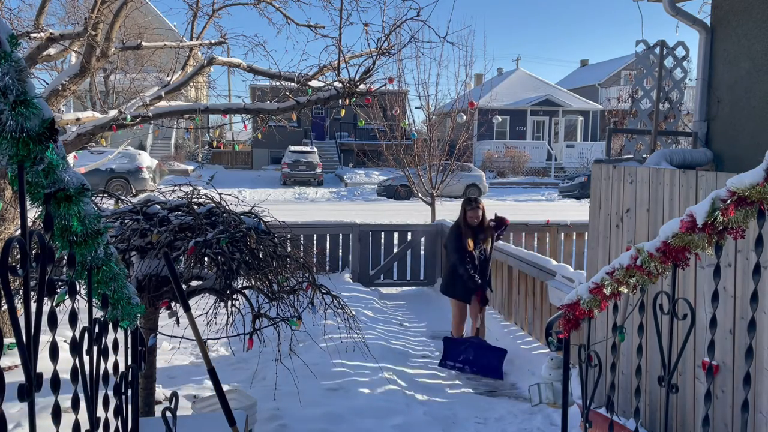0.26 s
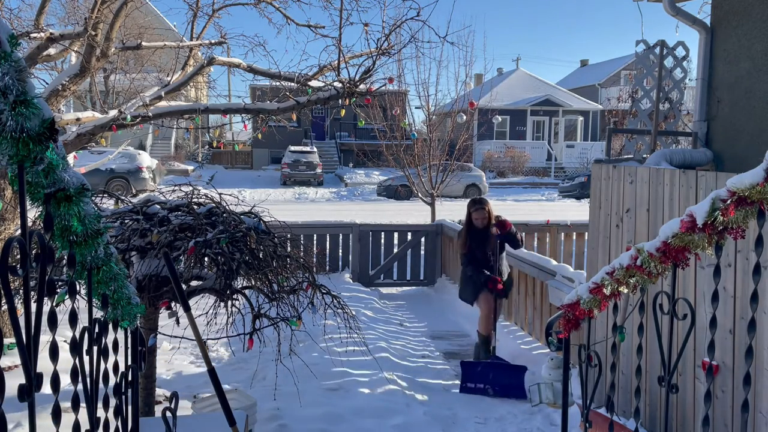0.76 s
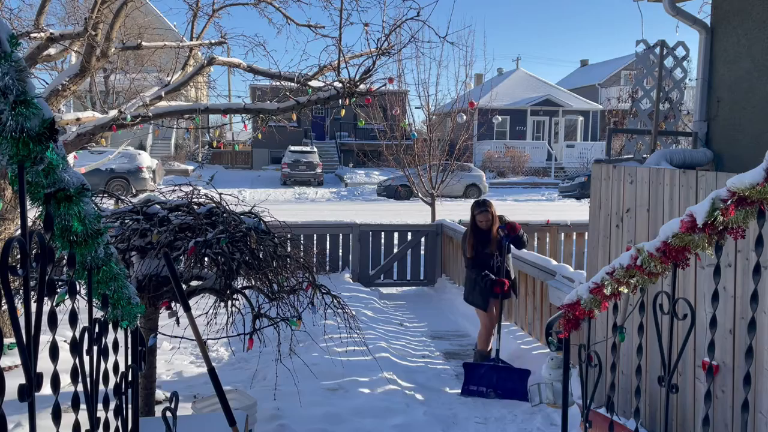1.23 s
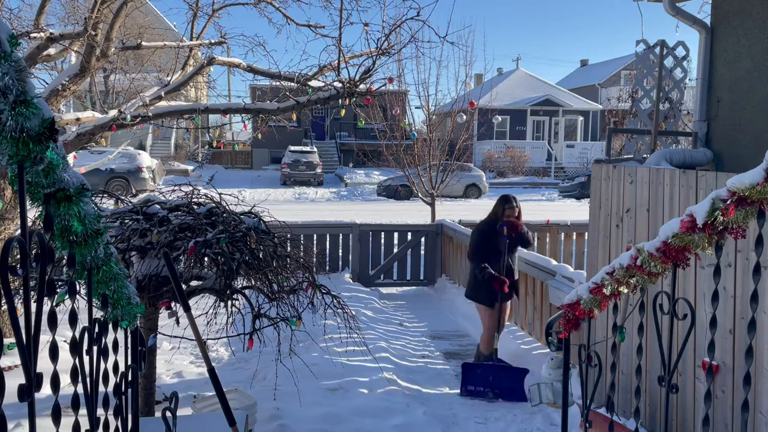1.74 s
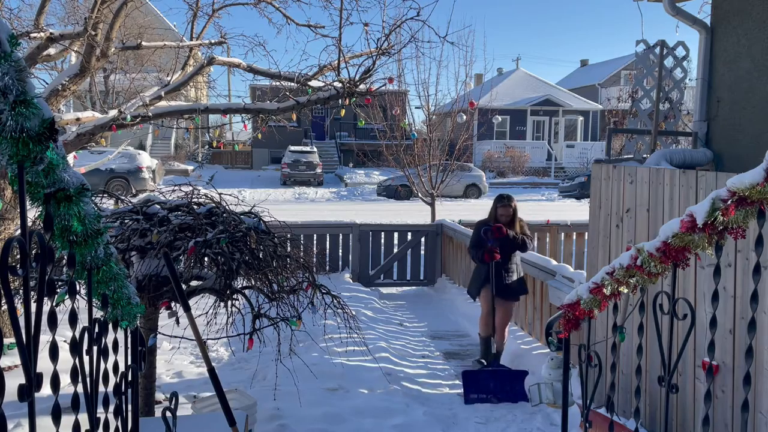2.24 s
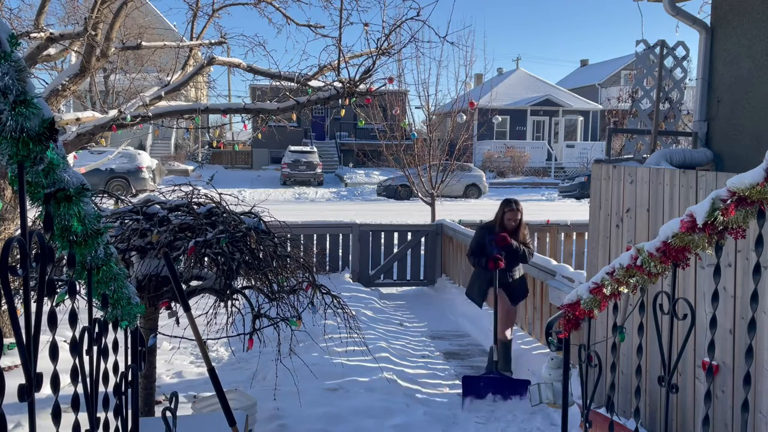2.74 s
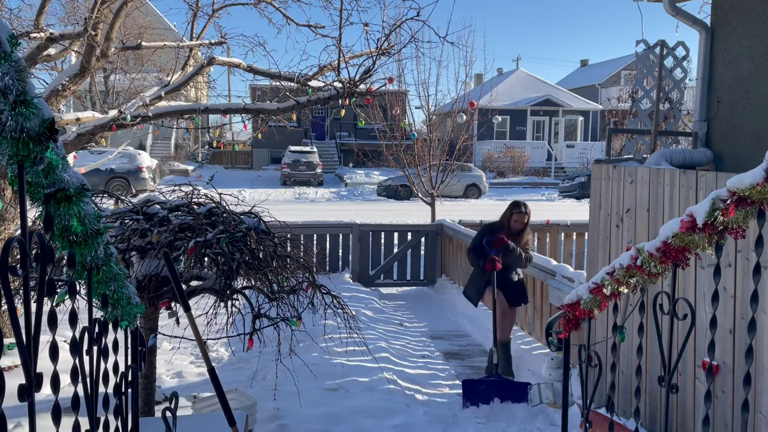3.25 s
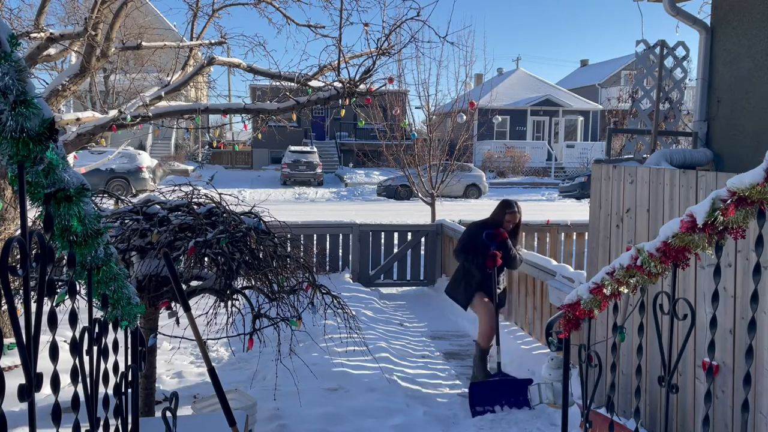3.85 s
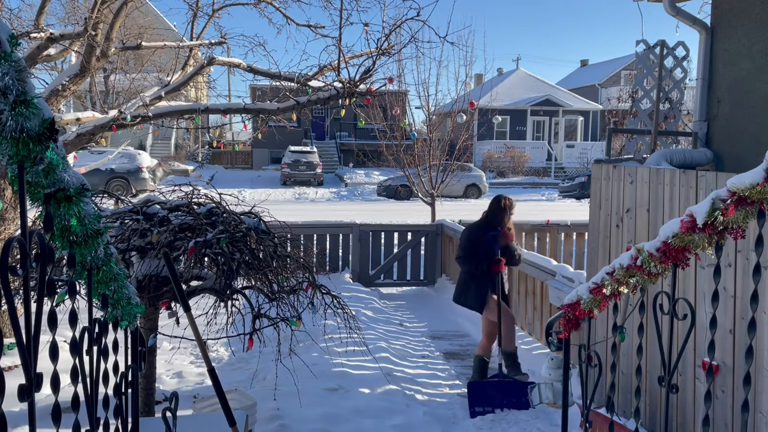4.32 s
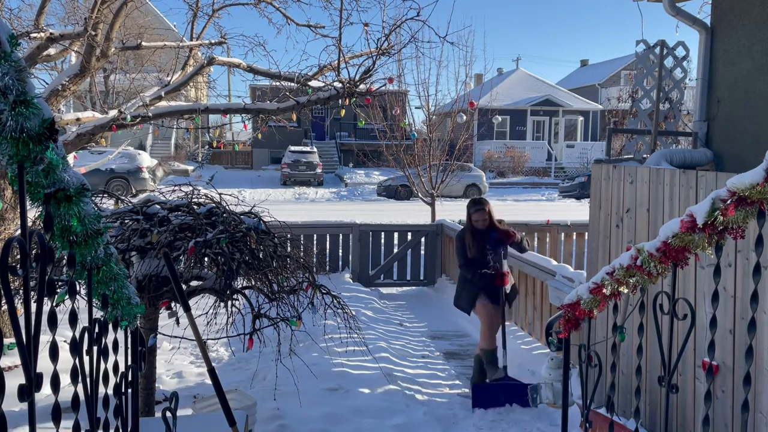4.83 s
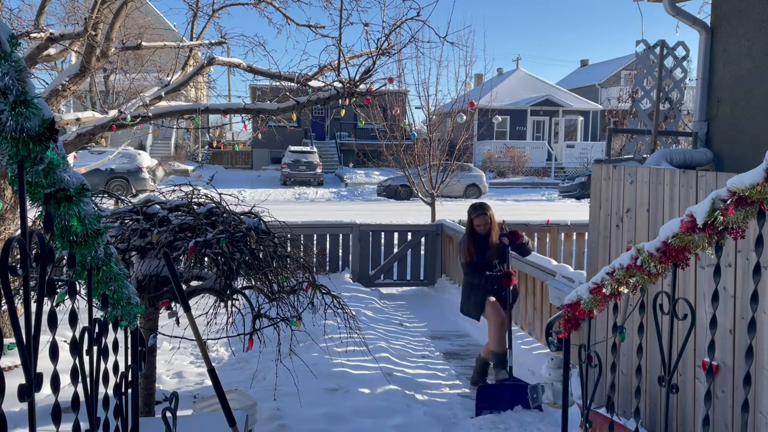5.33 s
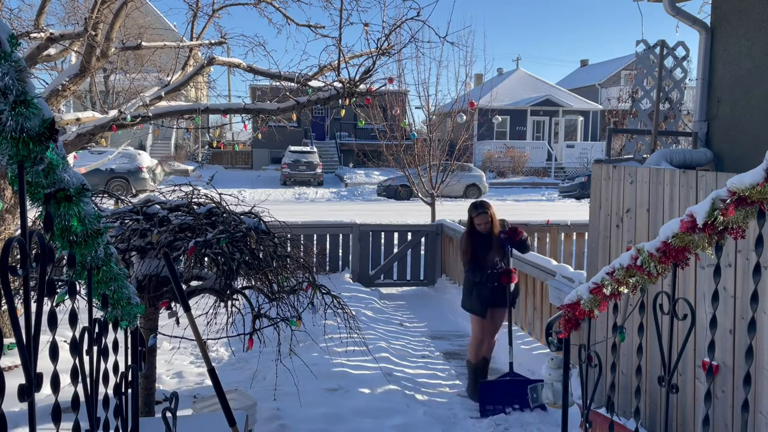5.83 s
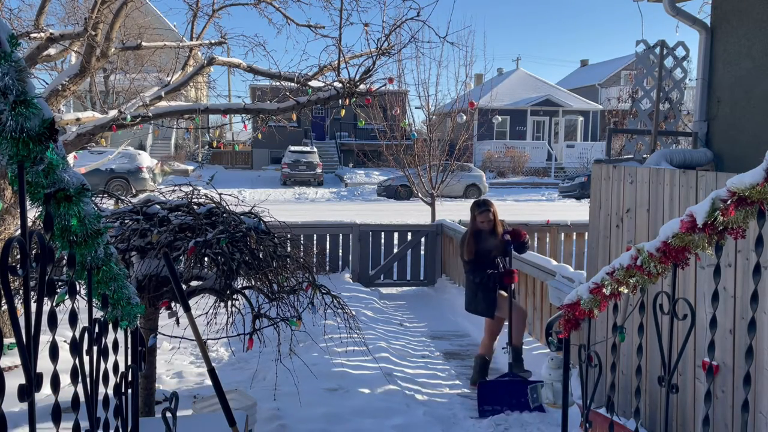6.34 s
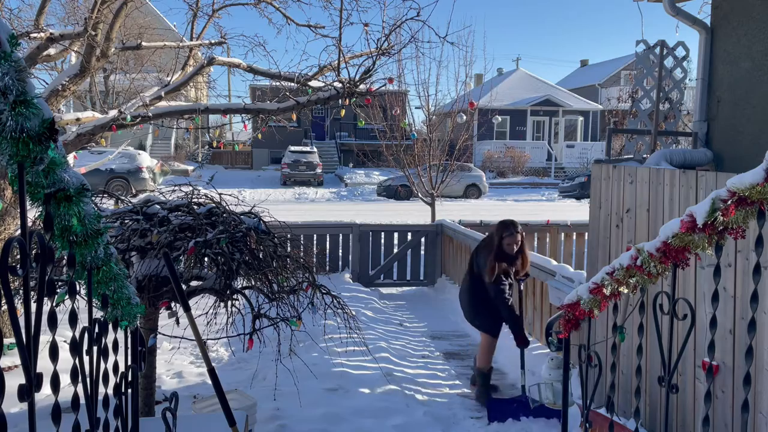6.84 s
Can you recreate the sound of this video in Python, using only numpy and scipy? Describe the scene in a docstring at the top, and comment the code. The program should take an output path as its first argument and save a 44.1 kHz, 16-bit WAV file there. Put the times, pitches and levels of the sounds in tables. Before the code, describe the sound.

A plastic shovel works through cold snow on a wooden deck in many short, irregular strokes. The blade catches with crisp crunches and sharp clicks, the boards thud dully beneath it, and loose snow hisses softly in between. The strokes grow lighter near the end as distant tyres swell a little. It is heard outdoors in a small yard, with very short reflections and a faint street rumble.

```python
"""Crunches, thuds and hiss: a plastic shovel working through cold snow on a wooden deck.
Each catch of the blade or tread of a boot is a burst of tiny snow fractures that rings the blade
and shakes the boards. The edge clicks on ice, loose snow slides, packed snow squeaks once.
Railings and house walls scatter it all, over a quiet street with distant tyres."""
import sys
import numpy as np
from scipy import signal
from scipy.fft import rfft, irfft
from scipy.io import wavfile
from scipy.ndimage import uniform_filter1d

SR = 44100
rng = np.random.default_rng(int(sys.argv[2]) if len(sys.argv) > 2 else 0)


def file_out(sig):
    """Save sig as 16-bit WAV at sys.argv[1]."""
    # one column per channel
    cols = np.atleast_2d(sig).T
    # limit, then scale
    lim = np.clip(cols, -1, 1)
    pcm = np.round(lim * 32767).astype(np.int16)
    wavfile.write(sys.argv[1], SR, pcm)


N = 312228
TIME = np.arange(N) / SR
FREQS = np.maximum(np.arange(N // 2 + 1) * SR / N, 1)
TOP_HZ = 15900

# plastic blade modes: freq_hz, width_hz, gain_db
BLADE_MODES = [(643, 14.4, 5.5), (1004, 140, -5), (1129, 85, 10.5), (1740, 270, -8.5), (2043, 36, 0),
               (2570, 630, -0.5), (3470, 170, -7.5), (3884, 210, -9), (4580, 260, -11.5)]
# pushes through loose snow: start_s, end_s, level_db
SHOVES = [(0.02, 0.20, -66.5), (0.524, 0.583, -51.5), (0.642, 0.68, -51.5), (0.789, 0.926, -45),
          (0.998, 1.08, -49.5), (1.212, 1.489, -48), (1.556, 1.657, -50), (1.669, 1.766, -59.5),
          (1.82, 1.879, -49.5), (2.14, 2.32, -48.5), (2.33, 2.596, -51.5), (2.724, 2.905, -48),
          (3.086, 3.271, -46.5), (3.32, 3.498, -52.5), (3.649, 3.811, -52.5), (4.279, 4.45, -48.5),
          (4.579, 4.67, -52.5), (4.738, 4.799, -61), (4.906, 5.024, -50), (5.199, 5.292, -50.5),
          (5.442, 5.511, -47.5), (5.593, 5.636, -39), (5.774, 5.919, -52), (6.217, 6.336, -58.5),
          (6.408, 6.483, -56.5), (6.599, 6.70, -54.5), (6.711, 6.866, -49.5), (6.865, 7.069, -58.5)]


def undb(db):
    """Decibels to gain."""
    return 10 ** (np.asarray(db) / 20)


def unit(x):
    """Scale to rms 1."""
    return x / np.sqrt(np.mean(x ** 2))


def colour(points):
    """Gain per frequency from rows of freq_hz, gain_db."""
    hz, db = np.transpose(points)
    return undb(np.interp(np.log(FREQS), np.log(hz), db))


def shape(x, gain):
    """Filter by a gain per frequency."""
    return irfft(rfft(x) * gain, N)


def ring(modes, freqs):
    """Summed response of damped resonances."""
    return sum(undb(db) / (1 + 1j * (freqs ** 2 - hz ** 2) / (freqs * width)) for hz, width, db in modes)


def walk(rate_hz):
    """Random drift, spread a little under 1."""
    knots = rng.standard_normal(int(TIME[-1] * rate_hz) + 2)
    return np.interp(TIME * rate_hz, np.arange(len(knots)), knots)


def distant(spectrum, alike_hz, waver_db):
    """Far-off wavering noise, alike in both ears only in the bass."""
    mid, side = rng.standard_normal((2, N))
    gain = colour(spectrum)
    width = 1 / np.sqrt(1 + (alike_hz / FREQS) ** 2)
    stereo = shape(mid, gain) + np.array([[1], [-1]]) * shape(side, gain * width)
    return unit(stereo) * undb(waver_db * walk(9.8))


def street(level_db=-52.5):
    """Low rumble of the still street."""
    # rumble spectrum: freq_hz, gain_db
    spectrum = [(25, -3.5), (60, -2), (130, 4.5), (200, 1), (330, -10), (550, -33), (1100, -39),
                (2200, -29), (5000, -38), (14000, -61)]
    return undb(level_db) * distant(spectrum, alike_hz=183, waver_db=-3.0)


def traffic():
    """Distant tyres, swelling near the end."""
    # tyre noise envelope: time_s, level_db
    levels = [(0, -53), (.4, -55), (1.2, -58.5), (4, -57.5), (5.5, -54.5), (6.1, -51), (6.6, -46.5),
              (7.08, -50)]
    # tyre spectrum: freq_hz, gain_db
    spectrum = [(60, -7), (150, 5.5), (350, 0.5), (550, -2.5), (900, -4.5), (1500, -11.5), (3000, -22),
                (8000, -36)]
    level_db = np.interp(TIME, *np.transpose(levels))
    return undb(level_db) * distant(spectrum, alike_hz=330, waver_db=0.8)


def wall_echoes(delay_s, t60_s, low_hz, high_hz):
    """Stereo frequency response of diffuse reflections, dulled by snow cover."""
    decay = undb(-60 * np.minimum(TIME / t60_s, 4))
    tail = rng.standard_normal((2, N)) * (TIME > delay_s) * decay
    tail /= np.sqrt(np.sum(tail ** 2, axis=1, keepdims=True))
    return rfft(tail) / np.sqrt((1 + (low_hz / FREQS) ** 2) * (1 + (FREQS / high_hz) ** 4))


def railings(x, t60_s=0.026, size=1024):
    """Quick scatter off the slats; new random paths each frame stand for the blade's movement."""
    _, _, frames = signal.stft(x, nperseg=size, nfft=4 * size)
    t, hop = np.arange(size) / SR, size // 2
    paths = rng.standard_normal((2, frames.shape[1], size)) * undb(-60 * t / t60_s)
    paths /= np.sqrt(np.sum(paths ** 2, axis=-1, keepdims=True))
    pieces = irfft(frames.T * rfft(paths, 4 * size)) * hop
    out = np.zeros((2, N + 6 * size))
    for k in range(frames.shape[1]):
        out[:, k * hop:k * hop + 4 * size] += pieces[:, k]
    return out[:, hop:hop + N]


def yard(x, walls_db=-21):
    """Mono to stereo: direct path, railing scatter, then the house walls."""
    # power share arriving via the railings: freq_hz, share_db
    scatter = [(100, -15), (330, -6), (600, -0.5), (1200, -9.5), (2500, -3), (5000, 0), (8000, -7),
               (14000, -5)]
    # direct path, reaching the left ear slightly after the right: freq_hz, phase_rad
    left_phase = [(350, 0), (900, -0.93), (1500, -1.54), (2800, 0.48), (5000, -1), (6300, -1.2),
                  (7900, -2.5), (9000, -4.5), (10500, -5.5), (12500, -20.5), (14000, -8)]
    # fence side against open side: freq_hz, left_minus_right_db
    balance = [(60, -3), (110, -1.5), (200, -3.5), (380, -3), (700, 0.5), (1200, -4), (2300, 1.5),
               (4400, 4.5), (8100, 0), (15000, -0.5)]
    scattered = np.minimum(colour(scatter), .95)
    phase_rad = np.interp(FREQS, *np.transpose(left_phase)) * np.array([[1], [0]])
    direct = np.sqrt(1 - scattered ** 2) * np.exp(1j * phase_rad)
    walls = undb(walls_db) * wall_echoes(delay_s=0.009, t60_s=0.12, low_hz=150, high_hz=7000)
    heard = shape(x, direct + walls) + shape(railings(x), scattered)
    return shape(heard, colour(balance) ** np.array([[.5], [-.5]]))


def fractures(per_s, spread_db, slip_hz, slip_db):
    """Dense clicks of breaking crystals, a few large, bunched by stick and slip."""
    size = undb(spread_db * np.minimum(rng.exponential(size=N), 4))
    clicks = (rng.random(N) < per_s / SR) * size * rng.choice([-1, 1], N)
    clicks *= undb(slip_db * walk(slip_hz))
    return clicks / np.sqrt(uniform_filter1d(clicks ** 2, size=800) + 1e-6)


def snow_band(low_hz, high_hz):
    """One band of the snow's spectrum as the blade radiates it, at unit power."""
    # breaking snow: freq_hz, gain_db
    spectrum = [(200, -25), (480, -3.5), (800, 1.5), (1100, -4.5), (1450, 0.5), (2000, -2), (2700, -4),
                (4000, -1), (5500, -3), (7500, -4), (9000, -7), (13000, -8), (14500, -27), (16000, -28)]
    gain = colour(spectrum) * (1 + ring(BLADE_MODES, FREQS))
    gain /= np.sqrt((1 + (low_hz / FREQS) ** 8) * (1 + (FREQS / high_hz) ** 8))
    return gain / np.sqrt(np.mean(abs(gain) ** 2))


def squeak(peak_s=4.48, width_s=0.01, level_db=-42):
    """Packed snow slips and chirps in a few narrow bands."""
    # slip resonances, applied twice: freq_hz, width_hz, gain_db
    modes = [(2080, 280, -1), (2330, 240, -5), (3400, 320, 0), (4120, 360, -9)]
    rub = unit(shape(rng.standard_normal(N), ring(modes, FREQS) ** 2))
    return rub * undb(level_db) * np.exp(-((TIME - peak_s) / width_s) ** 2)


def slide(gain_db=-4, trickle_db=-80, attack_s=0.008, release_s=0.035):
    """Loose snow hisses over the blade during shoves and trickles in between."""
    flow = undb(trickle_db)
    for start_s, end_s, db in SHOVES:
        outside = np.maximum((start_s - TIME) / attack_s, (TIME - end_s) / release_s)
        flow = np.maximum(flow, undb(db + gain_db) * np.exp(-np.clip(outside, 0, 20)))
    grains = fractures(per_s=7000, spread_db=3.8, slip_hz=70, slip_db=3)
    return shape(grains * flow, snow_band(1030, 14600))


def ticks(decay_s=0.0018):
    """The edge clicks on ice and board and leaves the blade ringing."""
    # edge contacts: start_s, level_db, ring_over_click_db
    hits = [(.356, -47, 3), (.457, -20, 3), (.501, -24, 5), (.748, -40, 17), (.850, -15, 1),
            (1.046, -41, 22), (1.500, -28, 6), (1.532, -21, 7), (1.589, -30, 6), (2.503, -25, 4),
            (2.711, -21, 8), (3.207, -21, 7), (3.336, -28, 6), (3.778, -34, 5), (4.053, -21, 6),
            (4.404, -33, 0), (4.859, -31, 7), (4.882, -23, 5), (5.056, -38, 9), (5.502, -34, 7),
            (5.599, -21, 4), (6.274, -36, 0), (6.449, -39, 6)]
    crack, push = np.zeros((2, N))
    t = np.arange(SR // 20) / SR
    for start_s, db, ring_db in hits:
        hit = rng.standard_normal(len(t)) * np.exp(-t / decay_s) * undb(db)
        near = slice(int(start_s * SR), int(start_s * SR) + len(t))
        crack[near] += hit
        push[near] += hit * undb(ring_db)
    return shape(crack, snow_band(700, TOP_HZ)) + shape(push, ring(BLADE_MODES, FREQS))


def jolts(swell_s=0.0072):
    """The deck bounces on its joists; snow damps it within a few cycles."""
    # heavy blows: start_s, peak_db, pitch_hz
    blows = [(0.829, -22, 169), (1.524, -28, 98), (2.511, -22.5, 148.8), (4.055, -19.5, 151),
             (5.153, -46, 119), (6.226, -25, 163)]
    out, t = np.zeros(N), np.arange(SR // 10) / SR
    envelope = t / swell_s * np.exp(1 - t / swell_s)
    for start_s, db, hz in blows:
        start = int(start_s * SR)
        out[start:start + len(t)] += undb(db) * envelope * np.sin(2 * np.pi * hz * t)
    return out


def pressure(t, rise_s, fall_s, round_s=0.0018, reach_s=0.12):
    """Load builds to a rounded peak at t = 0, then lets go."""
    away_s = np.hypot(t, round_s) - round_s
    return np.exp(-away_s / np.where(t < 0, rise_s, fall_s) - (t / reach_s) ** 4)


def burst(peak_s, length_s, crunch_db, treble_db, thud_db, pitch_hz, rise_share=0.4):
    """One giving-way of snow, its length split into loading and release."""
    rise_s = length_s * rise_share
    return peak_s, rise_s, length_s - rise_s, crunch_db, treble_db, thud_db, pitch_hz


def knocks(length_s=0.013):
    """Boot or blade knocks dully on the boards, squashing a little snow."""
    # dull contacts: peak_s, thud_db
    hits = [(0.029, -45.5), (1.213, -34), (1.23, -31), (1.84, -27), (2.345, -29.5), (2.875, -21),
            (3.014, -19), (3.109, -36.5), (3.366, -26), (4.610, -33.5), (5.058, -32), (6.632, -29.5)]
    return [burst(peak_s, length_s, crunch_db=db - 20.5, treble_db=-1, thud_db=db, pitch_hz=268)
            for peak_s, db in hits]


def snags(per_s=25, length_s=0.021, over_shove_db=3, spread_db=4.7):
    """Small catches at uneven steps along every shove."""
    bursts = []
    for start_s, end_s, shove_db in SHOVES:
        count = max(round((end_s - start_s) * per_s), 1)
        places, sizes = rng.random(size=16), rng.standard_normal(size=16)
        for k in range(count):
            db = shove_db + over_shove_db + spread_db * sizes[k]
            peak_s = start_s + (end_s - start_s) * (k + (.5 + places[k]) / 2) / count
            bursts.append(burst(peak_s, length_s, db, treble_db=-1, thud_db=db + 2, pitch_hz=230))
    return bursts


def catches():
    """The blade catches and the snow gives way."""
    # blade catches: peak_s, length_s, crunch_db, treble_over_crunch_db, thud_db, thud_pitch_hz
    hits = [(0.091, 0.048, -50, -10, -49, 210), (0.459, 0.014, -27.5, -1.5, -23.5, 250),
            (0.506, 0.024, -38.5, -4, -29, 266), (0.525, 0.013, -33.5, -5, -30.5, 230),
            (0.685, 0.023, -34.5, -7, -31, 274), (0.834, .023, -22, -5.5, -15.5, 320),
            (0.901, 0.017, -37, 1, -32.5, 262), (1.017, 0.033, -39, 0.5, -41, 275),
            (1.255, 0.0054, -39, 4.5, -39, 219), (1.424, 0.012, -42, -1, -39, 216.5),
            (1.516, 0.021, -25.5, -5.5, -19.5, 227), (1.533, 0.0078, -16, -8.5, -17.5, 330),
            (1.593, .027, -37, -1, -30.5, 280), (1.805, 0.016, -40, 1, -40, 230),
            (2.113, 0.023, -27.5, -4, -23.5, 305), (2.29, 0.015, -40, -3, -33.5, 250),
            (2.51, 0.021, -22, 0, -18.5, 243), (2.588, 0.023, -28, -4.5, -24.5, 269),
            (2.719, 0.026, -20, -4.5, -16, 266.4), (2.994, 0.021, -19.5, -4.5, -15, 248),
            (3.213, 0.023, -21, -3.5, -16, 286), (3.335, 0.032, -32, -9, -27, 262),
            (3.404, 0.036, -29, -2.5, -19.5, 295), (3.435, 0.026, -29, 0, -26.5, 250),
            (3.538, 0.033, -48, -1.5, -46.5, 179), (3.783, 0.027, -36, -1.5, -31, 230),
            (4.057, 0.016, -20, -0.5, -17, 223), (4.132, 0.031, -43, 0.5, -40, 254),
            (4.251, 0.011, -40, -5, -35.5, 240), (4.377, 0.019, -31.5, 0.5, -31, 177.5),
            (4.891, 0.023, -18, -2, -18, 263), (5.021, .02, -47, 1.5, -39, 230),
            (5.158, 0.018, -20.5, -3.5, -21, 224.4), (5.257, 0.0078, -37, -4.5, -35.5, 220),
            (5.405, 0.016, -20.5, -7, -19, 219), (5.505, 0.0083, -33.5, -12, -35.5, 210.3),
            (5.604, 0.014, -28.5, -18, -20.5, 224), (5.685, 0.022, -40.5, -0.5, -36, 195.3),
            (5.843, 0.025, -43, 2, -32, 256.5), (5.869, 0.016, -33, -2.5, -27, 259),
            (5.938, 0.012, -53.5, 12, -44.5, 220), (6.025, 0.032, -39, -2.5, -35, 295),
            (6.230, 0.024, -42, 1, -28.5, 201.5), (6.270, 0.018, -42, 4, -43.5, 240),
            (6.451, 0.043, -44.5, -6.5, -39.5, 225), (6.594, 0.053, -41.5, -8, -38, 290.6),
            (6.750, 0.047, -32.5, -8, -29.5, 315), (7.012, 0.065, -54, -1, -46.5, 226)]
    return [burst(*hit) for hit in hits]


def thuds(bursts, gain_db=-1.0, focus_db=20.0, knock_gain=0.86, size=16384):
    """Each burst shakes the boards; where the load bears favours modes near one pitch."""
    # bending modes of boards and scoop: freq_hz, width_hz, gain_db
    deck_modes = [(79, 29, -22), (134.2, 11.4, 6), (158.2, 25, 1), (203.6, 47, -0.5), (248.3, 50, -0.5),
                  (327.2, 29, 4), (344, 16.6, -4), (445.6, 17.6, 5.5), (653, 420, 26.5)]
    out = np.zeros(N + 2 * size)
    t = (np.arange(size) - size // 2) / SR
    freqs = np.maximum(np.arange(size // 2 + 1) * SR / size, 1)
    passband = 1 / (1 + (70 / freqs) ** 4) / (1 + (freqs / 580) ** 6)
    impulse = unit(signal.unit_impulse(size, size // 2 - 90))  # 2 ms before the peak
    for peak_s, rise_s, fall_s, _, _, thud_db, pitch_hz in bursts:
        modes = [(hz, width, db - focus_db * np.log2(hz / pitch_hz) ** 2) for hz, width, db in deck_modes]
        push = unit(rng.standard_normal(size) * pressure(t + 0.0009, rise_s, fall_s))
        blow = impulse * knock_gain * np.exp(-rise_s / .02)  # slow loads hardly knock
        thud = irfft(rfft(push + blow) * ring(modes, freqs) * passband)
        load_rms = np.sqrt(np.mean(pressure(t, rise_s, fall_s) ** 2))
        start = int(peak_s * SR) + size // 2
        out[start:start + size] += unit(thud) * load_rms * undb(thud_db + gain_db)
    return out[size:size + N]


def crunches(bursts, body_db=-0.55, crisp_db=-2.0, clod_db=2.5, split_hz=1600):
    """Each burst breaks crystals: a coarse crunch and a crisp top."""
    coarse_power, fine_power = np.zeros((2, N))
    for peak_s, rise_s, fall_s, crunch_db, treble_db, _, _ in bursts:
        near = slice(max(int((peak_s - .12) * SR), 0), int((peak_s + .16) * SR))
        power = (undb(crunch_db) * pressure(TIME[near] - peak_s, rise_s, fall_s)) ** 2
        coarse_power[near] += power
        fine_power[near] += power * undb(treble_db) ** 2
    grains = fractures(per_s=13000, spread_db=3.0, slip_hz=320, slip_db=1.5)
    coarse = grains * np.sqrt(coarse_power)
    clods = undb(clod_db * walk(25))  # changing clod size tilts the crunch low or high
    band = snow_band(540, 3450)
    low = 1 / (1 + (FREQS / split_hz) ** 4)
    body = shape(coarse * clods, band * low) + shape(coarse / clods, band * (1 - low))
    top = shape(grains * np.sqrt(fine_power), snow_band(4900, TOP_HZ))
    return undb(body_db) * body + undb(crisp_db) * top


def scene():
    """The shovel in its yard, over the street."""
    bursts = catches() + knocks() + snags()
    shovel = crunches(bursts) + ticks() + thuds(bursts) + jolts() + slide() + squeak()
    return yard(shovel) + street() + traffic()


def record(dry):
    """Steep low-pass at TOP_HZ."""
    return signal.sosfilt(signal.ellip(8, .2, 70, TOP_HZ, fs=SR, output="sos"), dry)


dry = scene()
out = record(dry)
file_out(out)
```